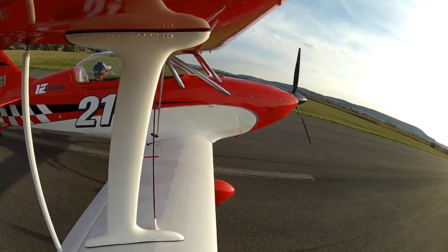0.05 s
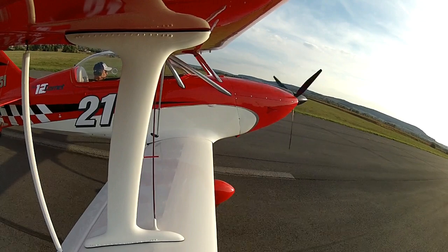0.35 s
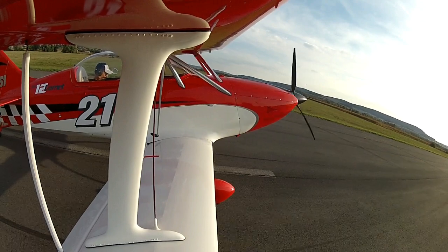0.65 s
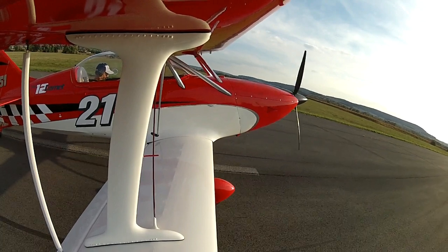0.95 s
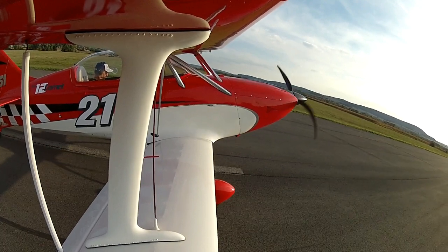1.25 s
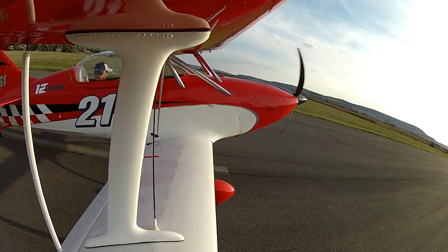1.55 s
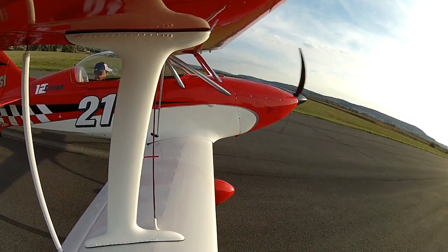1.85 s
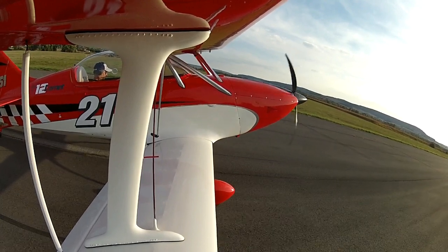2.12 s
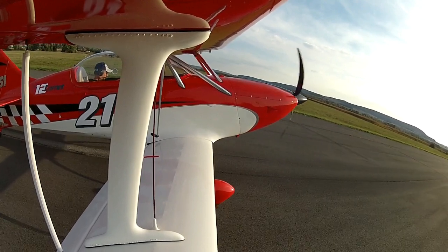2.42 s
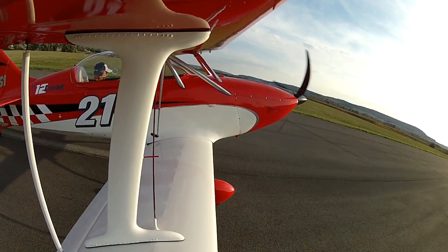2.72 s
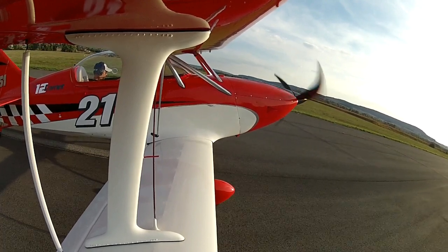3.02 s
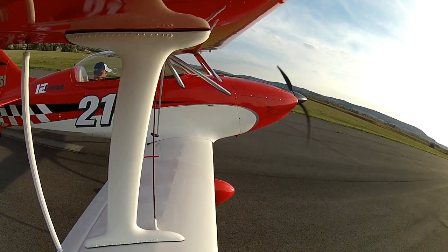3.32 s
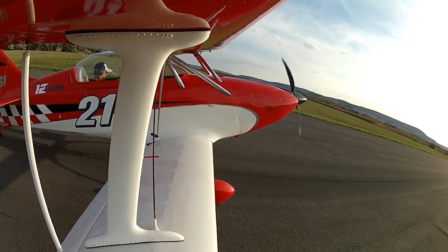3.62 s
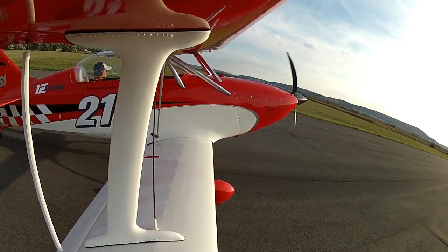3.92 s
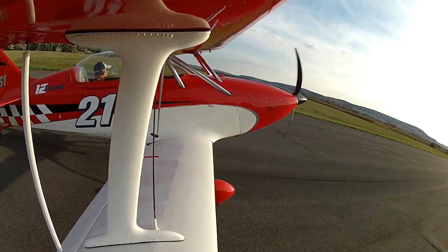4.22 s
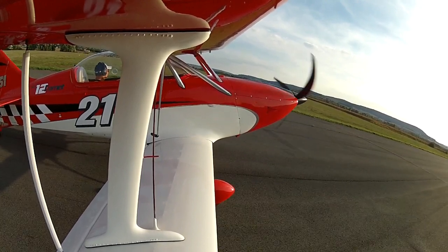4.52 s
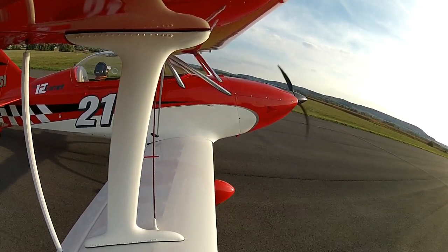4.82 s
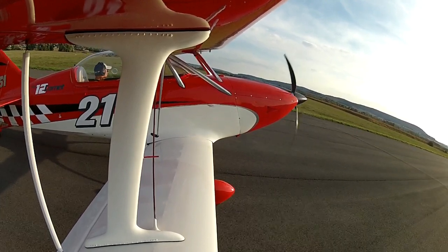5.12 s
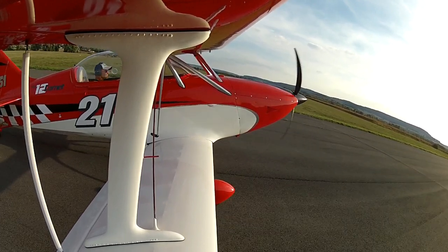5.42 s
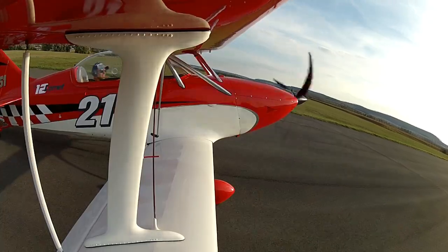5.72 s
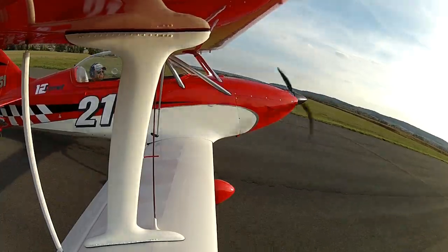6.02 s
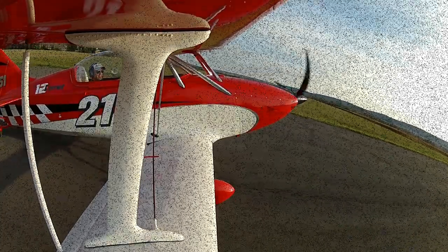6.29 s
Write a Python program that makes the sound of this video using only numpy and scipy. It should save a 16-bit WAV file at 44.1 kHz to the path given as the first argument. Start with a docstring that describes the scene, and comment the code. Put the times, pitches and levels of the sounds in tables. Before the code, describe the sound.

Heard from the wing, a biplane's starter heaves and clanks, then the engine sputters to life and evens into a droning idle.

```python
"""On the wing of a small biplane: the piston engine is cranked, catches, flares up and settles to idle.
The starter heaves it over its compressions while the slack drive clanks. Cylinders fire out of step,
then sputter evens into a boomy drone, carried by the airframe, with gas and propeller hiss and wing shudder.
A wing-mounted camera samples at a low rate and holds each value, mirroring the drone into a thin whine."""
import sys
import numpy as np
from scipy import signal
from scipy.fft import rfft, irfft, next_fast_len
from scipy.io import wavfile
from scipy.ndimage import uniform_filter1d

SR = 44100
rng = np.random.default_rng(int(sys.argv[2]) if len(sys.argv) > 2 else 0)


def dump(signal):
    """Clip the signal to [-1, 1] and save it as 16-bit WAV at the path in sys.argv[1]."""
    limited = np.clip(np.atleast_2d(signal).T, -1, 1)
    pcm = np.round(limited * 32767).astype(np.int16)
    wavfile.write(sys.argv[1], SR, pcm)


N = 284651
TIME_S = np.arange(N) / SR
IDLE_HZ, FLARE_HZ = 54.5, 5.95  # firing rate; flare adds to it

# Drone partials at idle: multiple_of_half_firing_rate, level_db
ENGINE_ORDERS = [(2, -22), (4, -7.5), (6, -18), (8, -3.4), (10, -7), (11, -16), (12, -8.5), (13, -20),
                 (14, -14.5), (16, -3.3), (17, -10), (18, -.4), (19, -1.1), (20, 0), (21, -12.5),
                 (22, -8.7), (24, -26), (25, -29.5), (26, -24.5), (27, -24.5), (28, -25.5), (29, -39),
                 (30, -43)]
# Airframe transfer: freq_hz, gain_db
AIRFRAME_RESPONSE = [(20, -4), (45, 7), (90, 4), (110, 0), (220, 0), (300, -3), (360, 0), (410, -2),
                     (480, 4.5), (545, 5.5), (600, -3), (680, -14), (750, -10.5), (780, -15), (815, -26),
                     (860, -25), (900, -14), (940, -24)]
# Ragged part of the combustion: firing_hz, power_share
SPUTTER_SHARE = [(12, .95), (26, .85), (36, .7), (44, .45), (52, 0)]
# First firings: start_s, crack_db, boom_db, decay_s
FIRST_FIRINGS = [(0.976, -21, -7.5, 0.014), (1.018, -25.5, -34, 0.011), (1.048, -20, -20.5, 0.037),
                 (1.079, -26, -9, 0.016), (1.116, -16.5, -35, 0.011), (1.141, -26, -17.5, 0.09),
                 (1.253, -37, -7, .006), (1.314, -23.5, -17, 0.014), (1.412, -28, -7, .005)]
# Compressions while cranking: start_s, length_s, rumble_db, hum_gain, shudder_db
COMPRESSIONS = [(0, 0.16, -16, 0.07, -33), (0.293, 0.37, -17.5, 0.56, -41), (0.69, .15, -19.5, 0.14, -40)]
# Knocks in the drive: start_s, ring_db, scrape_db
DRIVE_KNOCKS = [(.008, -40, -32), (.088, -40.5, -48), (.358, -47.5, -47), (.415, -46, -35),
                (0.457, -27.5, -46), (.525, -48, -37), (0.599, -36.5, -46), (.629, -43, -50),
                (.691, -27.5, -30), (0.796, -40, -45), (.835, -34.5, -37), (.91, -48, -42),
                (0.944, -38, -32), (.962, -36, -38)]
# Modes of the knocked metal: pitch_hz, width_hz, level_db
METAL_MODES = [(750, 33, 4), (850, 68, -25), (1310, 81, 4.5), (1560, 47, -13), (1770, 70, -7),
               (2390, 77, -27)]
# Noise spectra: freq_hz, density_db
ROAR_SPECTRUM = [(25, -41), (55, -7), (100, -3.5), (200, -0.5), (400, -1.5), (520, 3.5), (610, -3),
                 (720, -14.5), (810, -24), (1100, -40.5)]  # even combustion
SPUTTER_SPECTRUM = [(30, 2), (60, 1), (170, 3), (300, 2), (470, 4), (600, 3), (700, -3.5), (780, -11.5),
                    (1000, -17)]  # ragged combustion, booms
HISS_SPECTRUM = [(500, -25), (870, 7), (1100, 0.5), (1400, 2), (1700, 0.5), (2150, 6.5), (2480, 2.5),
                 (2700, 5), (3000, -2), (3450, -0.5), (3750, -7), (4000, 3.5)]  # gas, propeller air
CRACK_SPECTRUM = [(400, -7), (860, 7), (1080, -2.5), (1400, 2), (1700, -1.5), (2100, 3), (2700, -5),
                  (3100, -9), (3900, -14)]  # first firings
RUMBLE_SPECTRUM = [(30, -20), (60, -5), (120, 2), (200, -1.5), (270, -3.5), (400, -4.5), (560, -7),
                   (640, -15.5), (700, -25.5), (850, -30), (950, -36), (1100, -54)]  # airframe while cranking
RASP_SPECTRUM = [(600, 7.5), (900, 2), (1200, -2), (1500, -3.5), (2200, -2.5), (2900, -12), (3900, -20)]  # starter drive
SCRAPE_SPECTRUM = [(700, 18), (1200, 3), (2000, 4), (2800, 1.5), (3500, -5.5), (3900, -11)]  # knocked metal


def engine(firing_hz, catch_s=1.039, fade_s=0.025, full_labour_hz_per_s=70, scatter_db=0.7):
    """Ragged combustion evens into drone and roar as speed builds; gas and propeller air hiss in step."""
    wandering_hz = firing_hz * (1 + 0.0015 * walk(18))
    phase_rad = np.pi * np.cumsum(wandering_hz) / SR  # one turn per two firings
    labour = np.clip(np.gradient(firing_hz) * SR / full_labour_hz_per_s, 0, 1)
    flare = np.maximum(firing_hz - IDLE_HZ, 0) / FLARE_HZ
    strength = undb(scatter_db * walk(IDLE_HZ))  # no two firings alike
    roar = undb(-8.8 - 0.8 * walk(3.03)) * noise(ROAR_SPECTRUM) * (1 + 0.17 * np.cos(phase_rad))
    even = strength * (drone(wandering_hz, phase_rad, labour) + roar)
    sputter = undb(-1.3) * noise(SPUTTER_SPECTRUM) * (1 + 0.14 * np.cos(4 * phase_rad))
    ragged_share = np.interp(wandering_hz, *np.transpose(SPUTTER_SHARE))
    combustion = np.sqrt(1 - ragged_share) * even + np.sqrt(ragged_share) * sputter
    combustion_db = -14 + 2 * labour - 2.5 * flare
    running = np.clip((TIME_S - catch_s) / fade_s, 0, 1)
    return running * (undb(combustion_db) * combustion + strength * hiss(firing_hz, phase_rad))


def firing_rate(runup_s=1.229, runup_width_s=0.122, flare_s=1.825, flare_width_s=0.298, hunt_period_s=4.4):
    """Firings per second: S-curve run-up, flare, slow hunting round idle."""
    runup = 1 / (1 + np.exp((runup_s - TIME_S) / runup_width_s))
    flare = np.exp(-((TIME_S - flare_s) / flare_width_s) ** 2)
    hunt_hz = 0.22 * np.sin(2 * np.pi * (TIME_S - 4.0) / hunt_period_s)
    return np.maximum(runup * (IDLE_HZ + hunt_hz) + FLARE_HZ * flare, 1)


def drone(firing_hz, phase_rad, labour, thump_db=4.5, dispersion_rad=1.215):
    """Engine orders slide through the airframe's resonances; labour adds thump and flutter."""
    partials, power = 0, 0
    for order, level_db in ENGINE_ORDERS:
        carried_db = spectrum_db(AIRFRAME_RESPONSE, order * firing_hz / 2)
        carried_idle_db = spectrum_db(AIRFRAME_RESPONSE, order * IDLE_HZ / 2)
        labour_db = thump_db * labour * (order in (4, 8, 12))
        gain = undb(level_db + carried_db - carried_idle_db + labour_db)
        flutter = 1 + 0.11 * (1 + 2 * labour) * walk(16)
        smear_rad = dispersion_rad * order ** 2  # bending-wave speed depends on pitch
        partials += gain * flutter * np.cos(order * phase_rad + smear_rad)
        power += gain ** 2 / 2
    return partials / np.sqrt(power)


def bangs(rise_s=0.0022):
    """The first cylinders fire out of step: each a crack and a boom."""
    crack, boom = noise(CRACK_SPECTRUM), noise(SPUTTER_SPECTRUM)
    return sum(burst(start_s, rise_s, decay_s) * (undb(crack_db) * crack + undb(boom_db) * boom)
               for start_s, crack_db, boom_db, decay_s in FIRST_FIRINGS)


def starter(release_s=1.05, fade_s=0.06, hum_hz=168, rasp_db_per_s=6):
    """The starter drags the engine round: airframe rumble, motor hum under load, growing drive rasp."""
    rumble_gain, hum_gain, _ = heaves()
    pitch_hz = hum_hz * (1 + 0.037 * walk(25.9))
    hum = hum_gain * np.sin(2 * np.pi * np.cumsum(pitch_hz) / SR)
    rumble = rumble_gain * unit_rms(noise(RUMBLE_SPECTRUM) + hum)
    rasp = undb(-53.5 + rasp_db_per_s * np.minimum(TIME_S, release_s)) * noise(RASP_SPECTRUM)
    engaged = np.clip((release_s - TIME_S) / fade_s + 1, 0, 1)
    return engaged * (rumble + rasp)


def heaves(attack_s=0.018, release_s=0.063, coast_db=-21.5):
    """Each compression loads the starter. Returns gains for rumble, motor hum and wing shudder."""
    rumble, hum, shudder = undb(coast_db), 0, 0
    for start_s, length_s, rumble_db, hum_gain, shudder_db in COMPRESSIONS:
        push = swell(start_s, length_s, attack_s, release_s)
        rumble = np.maximum(rumble, undb(rumble_db) * push)
        hum += hum_gain * push
        shudder += undb(shudder_db) * push
    return rumble, hum, shudder


def clanks(rise_s=0.00063, decay_s=0.02):
    """Slack in the drive knocks: each rattle rings the metal and scrapes."""
    rattle, scrape = unit_rms(rng.standard_normal(N) ** 3), noise(SCRAPE_SPECTRUM)
    force, rub = 0, 0
    for start_s, ring_db, scrape_db in DRIVE_KNOCKS:
        blow = burst(start_s, rise_s, decay_s)
        force += undb(ring_db) * blow
        rub += undb(scrape_db) * blow
    return ring(force * rattle, METAL_MODES) + rub * scrape


def hiss(firing_hz, phase_rad, idle_db=-38.5, boost_db=9.5, knee_hz=7.9):
    """Gas and propeller air throb with the firings, louder below idle speed."""
    shortfall_hz = np.maximum(IDLE_HZ - firing_hz, 0)
    level_db = idle_db + boost_db * np.tanh(shortfall_hz / knee_hz)
    throb = 1 + 0.045 * (np.cos(phase_rad) + np.cos(2 * phase_rad))
    return noise(HISS_SPECTRUM) * undb(level_db + 0.2 * walk(250)) * throb


def wing_shudder(firing_hz, resonance_hz=16, width_hz=5.6, resonance_db=-23.5, floor_db=-53.5):
    """The wing shakes with each heave, and most as the firing rate crosses its resonance."""
    _, _, heave_gain = heaves()
    detuning = (firing_hz / resonance_hz - resonance_hz / firing_hz) * resonance_hz / width_hz
    resonance_gain = undb(resonance_db) / (1 + detuning ** 2)
    floor_gain = undb(floor_db + 2.5 * walk(4))
    return (heave_gain + resonance_gain + floor_gain) * noise([(18, 0), (30, -3), (48, 1)])


def undb(db):
    """Decibels to gain."""
    return 10 ** (np.asarray(db) / 20)


def unit_rms(x):
    """Scale to rms 1."""
    return x / np.sqrt(np.mean(x ** 2))


def spectrum_db(spectrum, at_hz):
    """Interpolate on a log-frequency axis."""
    freq_hz, level_db = np.transpose(spectrum)
    return np.interp(np.log(at_hz), np.log(freq_hz), level_db)


def noise(spectrum):
    """Shaped noise, steep roll-off past both ends; rms 1."""
    size = next_fast_len(N)
    freq_hz = np.maximum(np.fft.rfftfreq(size, 1 / SR), 1)
    skirts = np.minimum(1, np.minimum(freq_hz / spectrum[0][0], spectrum[-1][0] / freq_hz)) ** 4
    gain = undb(spectrum_db(spectrum, freq_hz)) * skirts
    return unit_rms(irfft(rfft(rng.standard_normal(size)) * gain, size)[:N])


def walk(rate_hz):
    """Random steps, smoothed twice; rms 1."""
    hold = max(int(SR / rate_hz), 1)
    steps = np.repeat(rng.standard_normal(N // hold + 1), hold)
    return unit_rms(uniform_filter1d(uniform_filter1d(steps, hold), hold)[:N])


def burst(start_s, rise_s, decay_s):
    """Envelope: linear rise to 1, exponential decay."""
    age_s = TIME_S - start_s
    return np.clip(age_s / rise_s, 0, 1) * np.exp(-np.clip((age_s - rise_s) / decay_s, 0, 20))


def swell(start_s, length_s, attack_s, release_s):
    """Envelope: reaches 1 by start_s, holds, decays."""
    age_s = TIME_S - start_s
    return np.clip(age_s / attack_s + 1, 0, 1) * np.exp(-np.clip((age_s - length_s) / release_s, 0, 20))


def ring(force, modes):
    """Parallel resonators; white noise keeps about its rms."""
    ringing, power = 0, 0
    for pitch_hz, width_hz, level_db in modes:
        resonator = signal.iirpeak(pitch_hz, pitch_hz / width_hz, SR)
        ringing += undb(level_db) * signal.lfilter(*resonator, force + 1e-18)
        power += undb(level_db) ** 2 * np.pi * width_hz / SR
    return ringing / np.sqrt(power)


def scene():
    """All sources at the wing, mono."""
    firing_hz = firing_rate()
    return (starter() + clanks() + bangs() + engine(firing_hz) + wing_shudder(firing_hz))[None]


def record(dry, store_hz=8000, hold_hz=48000, band_hz=3800, top_hz=15280):
    """Low-rate sample-and-hold mirrors the sound about that rate; the top is cut."""
    stored = np.clip(signal.resample_poly(dry, store_hz, SR, axis=-1), -1, 1)
    stored = signal.sosfilt(signal.butter(2, band_hz, fs=store_hz, output="sos"), stored)
    steps = np.repeat(stored, hold_hz // store_hz, axis=-1)
    held = signal.resample_poly(steps, SR, hold_hz, axis=-1)[:, :N]
    return signal.sosfilt(signal.ellip(14, 0.1, 90, top_hz, fs=SR, output="sos"), held)


dry = scene()
out = record(dry)
dump(out)
```